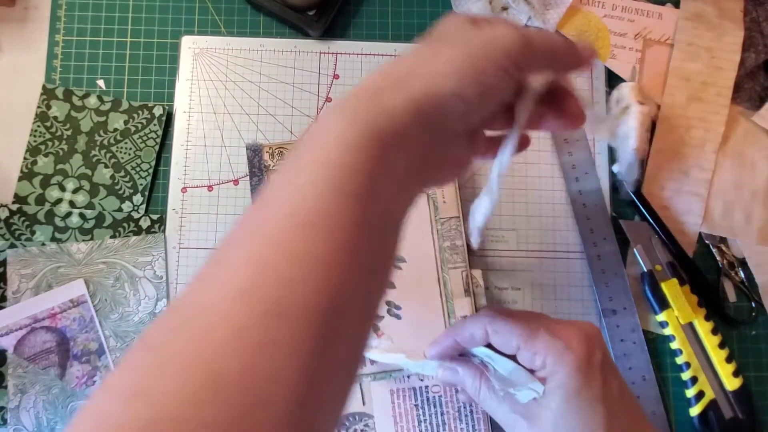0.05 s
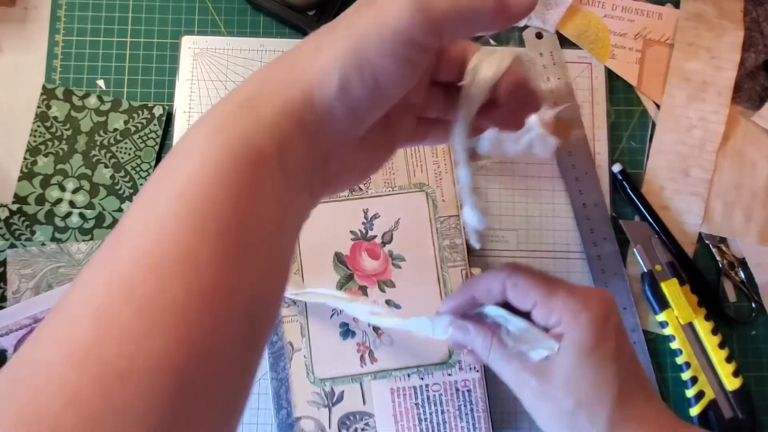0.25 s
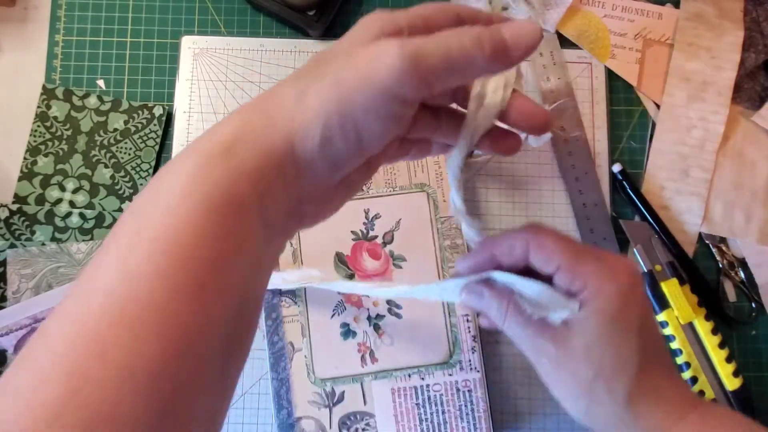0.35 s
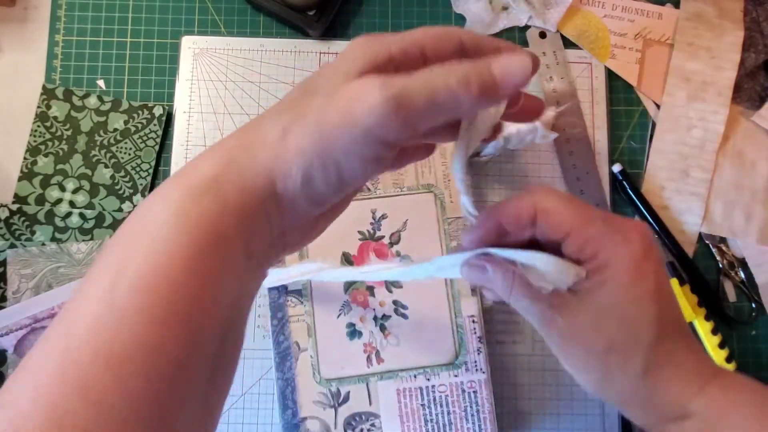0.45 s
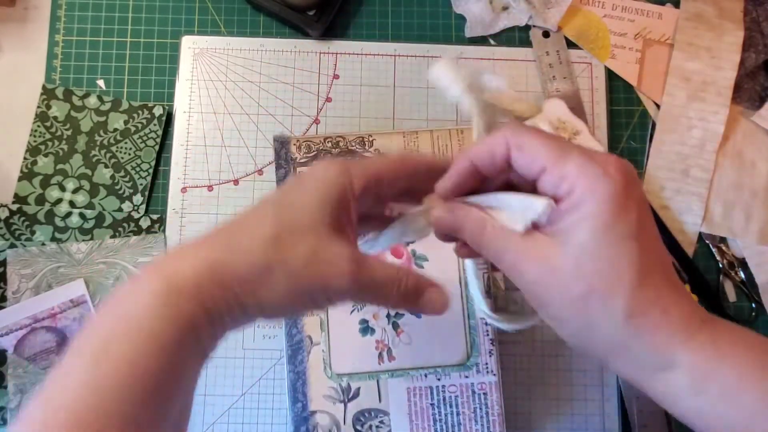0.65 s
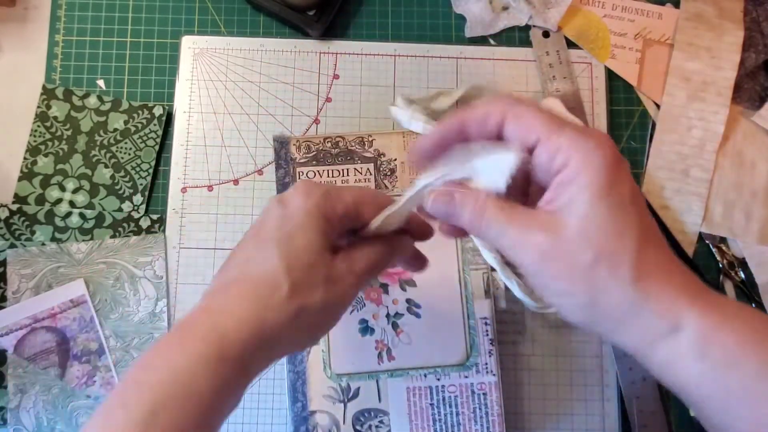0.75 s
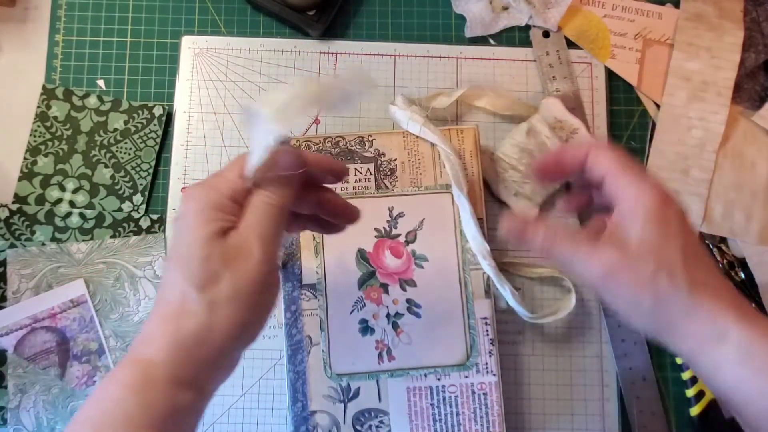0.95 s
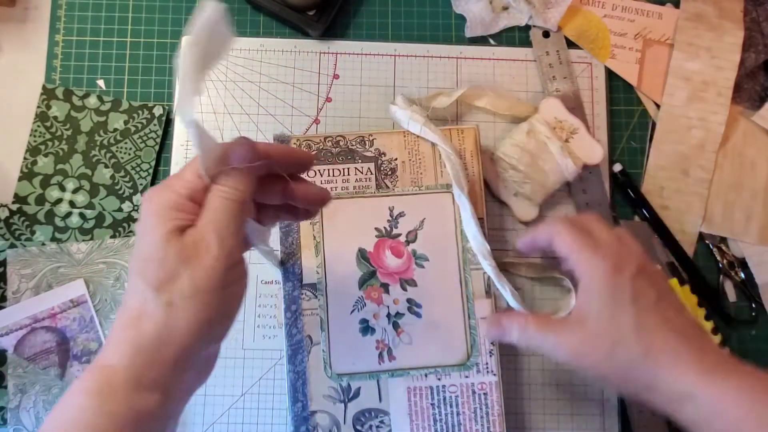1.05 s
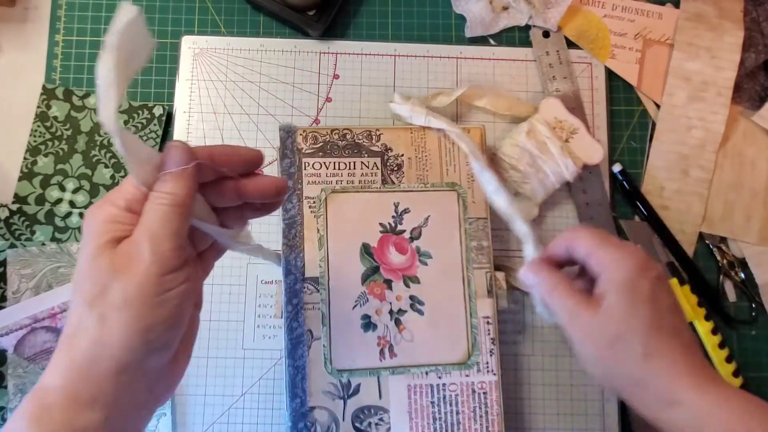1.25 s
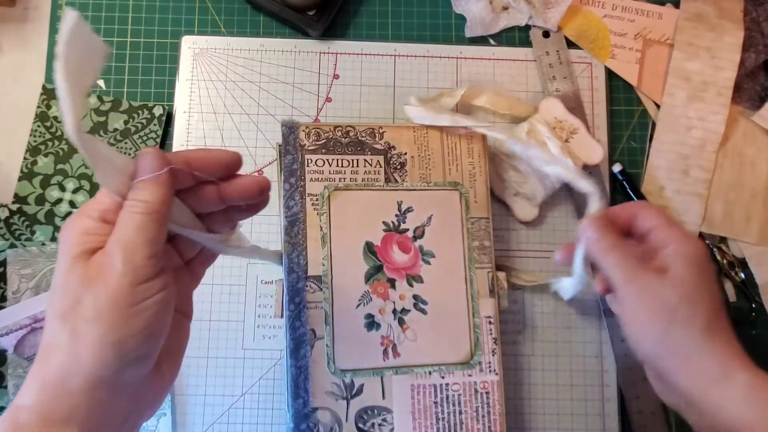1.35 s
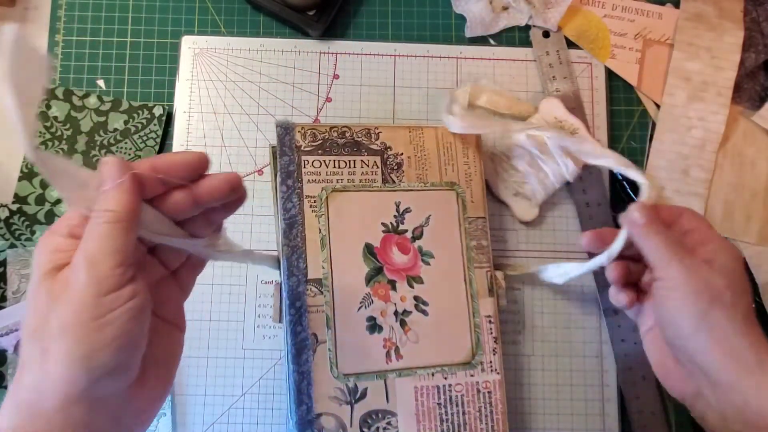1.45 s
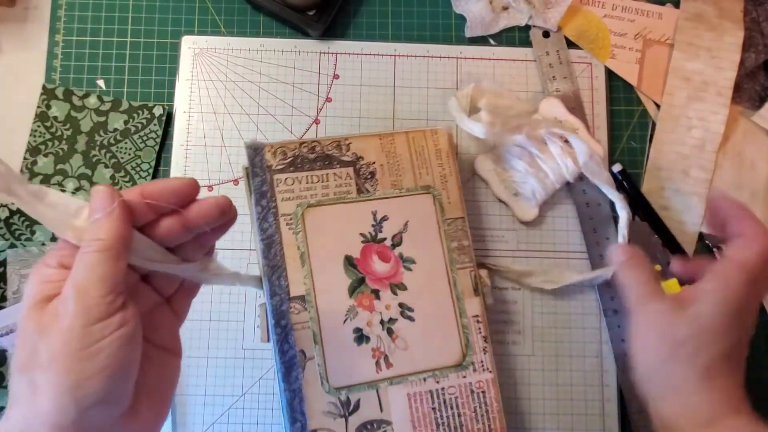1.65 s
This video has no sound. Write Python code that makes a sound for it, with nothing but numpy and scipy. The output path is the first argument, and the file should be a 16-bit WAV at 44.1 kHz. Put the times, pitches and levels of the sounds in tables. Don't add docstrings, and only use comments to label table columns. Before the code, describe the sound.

Ringing, gritty scrape of a hard object dragged across a craft mat, followed by soft silk swishes

```python
import sys
import numpy as np
from scipy import signal
from scipy.fft import rfft, irfft
from scipy.io import wavfile
from scipy.ndimage import uniform_filter1d

SR = 44100
rng = np.random.default_rng(int(sys.argv[2]) if len(sys.argv) > 2 else 0)


def makeup_ratio(level_db):
    decades = np.asarray(level_db, float) / 20
    return 10 ** decades


def wrap_up_sound(samples):
    columns = np.atleast_2d(samples).T
    tamed = np.clip(columns, -1, 1)
    steps = np.round(tamed * 32767).astype(np.int16)
    wavfile.write(sys.argv[1], SR, steps)


N = 74970

LEAN_DB, LATE_LEAN_DB, LATE_FROM_S = 4, -0.5, 0.85


def drag():
    # [t/s, level/dB]
    strokes = [
        [(0.212, -66.5), (0.218, -27), (0.238, -24), (0.288, -30.5), (0.304, -25), (0.374, -35.5), (0.386, -32),
         (0.44, -45)],
        [(0.44, -50.5), (0.488, -38.5), (0.506, -39), (0.548, -43.5), (0.592, -41.5), (0.64, -60.5)],
        [(0.64, -53), (0.668, -49.5), (0.682, -41), (0.71, -40), (0.752, -46), (0.762, -71.5), (0.88, -100)],
    ]
    # [t/s, jump/dB, ring/s]
    slips = [(0.22, -3.5, 0.0033), (0.232, 1.5, .01), (0.2484, 7.5, .005), (.261, 5, 0.002),
             (0.279, 2, .004), (0.2906, 11, .003), (.3007, 10.5, 0.0012), (0.335, 0, 0.0019),
             (0.387, 3.5, 0.01), (0.499, -9, 0.0025), (0.5023, 2.5, .01), (0.564, 8, 0.0093),
             (0.7002, 5, 0.0035), (0.709, 6.5, .002), (0.734, -1, 0.0018)]
    # [f/Hz, width/Hz, level/dB]
    body_modes = [(1016, 26, -5), (2600, 55, 3), (3560, 60, -4), (2480, 60, -7), (775, 60, -12),
                  (1745, 45, -9), (1950, 45, -14), (2165, 70, -8), (2900, 35, -8), (3200, 40, -11),
                  (3850, 120, -9), (4120, 100, -12), (4840, 60, -13), (6100, 400, -7), (8200, 500, -15)]
    # [t/s, f/Hz]
    edge_mode = [(.22, 3750), (.24, 3604), (.31, 3674), (.39, 3966), (.45, 3410), (.52, 3565), (.68, 3480),
                 (.72, 3540)]
    # [f/Hz, level/dB per Hz]
    grit_colour = [(100, -10), (700, -9.5), (1300, -21.5), (2500, -11.5), (4400, -9.5), (7000, 0.5),
                   (11400, 0.5), (16000, -16.5)]
    # [f/Hz, level/dB per Hz]
    slide_colour = [(120, -42), (200, -18.5), (635, -12.5), (1200, -4), (1900, 7.5), (2700, 5),
                    (3600, -6.5), (4500, -8.5), (11500, -37), (16000, -33.5)]
    # [f/Hz, width/Hz, level/dB]
    table_modes = [(79, 34, -45.5), (171.5, 9.9, -50), (145, 11.7, -48), (303.7, 17, -51.5)]
    # [t/s, peak/dB, f/Hz, ring/s]
    struck_modes = [(.009, -46, 3730, 0.006), (.012, -41, 3610, 0.0051), (.038, -38.5, 3820, 0.0021),
                    (.0735, -47, 2560, 0.0046), (1.19, -57.5, 690, 0.0084), (1.214, -71, 748, .007),
                    (.221, -15.5, 3470, .004), (.233, -21, 3530, 0.0047), (0.237, -25, 2587, 0.023),
                    (.2478, -14, 3610, 0.0032), (0.248, -24, 2553, .008), (.26, -44, 3590, 0.0076),
                    (0.264, -34, 2756, 0.0033), (.222, -30.5, 1056, 0.011), (0.229, -40.5, 166.4, 0.073),
                    (.29, -44, 160.3, 0.044), (0.304, -28, 6320, 0.0068), (.24, -27, 5730, 0.015),
                    (0.2942, -44, 2699, 0.0031), (0.295, -25.5, 1026, 0.019), (.2996, -33, 3580, 0.0041),
                    (.308, -22, 3710, .008), (0.323, -56, 2570, 0.0067), (.336, -34, 3680, 0.0031),
                    (.383, -25, 3540, 0.0043), (.389, -36, 3950, 0.0055), (.385, -43, 1024, 0.031),
                    (0.394, -35.5, 2606, 0.015), (.504, -44.5, 761, .01), (0.509, -40, 2900, 0.017),
                    (.512, -36.5, 3536, 0.012), (.575, -50, 1974, 0.015), (.68, -49, 3500, 0.0062),
                    (.708, -53.5, 3470, .006), (0.708, -40, 2504, .01)]
    grit_db, slide_db, light_ring_db = -3, -12, -16
    full_db, press_law, table_law = -25.5, 1, 0.73
    chatter_db, contact_db, pitch_wander = -1, 1.5, 0.004

    t = np.arange(N) / SR
    point_s, point_db = np.transpose([point for stroke in strokes for point in stroke])
    pressure_db = np.interp(t, point_s, point_db, -130, -130)
    jumps_db = sum(jump_db * after(t, s, ring_s) for s, jump_db, ring_s in slips)
    bumps = grains(per_s=6700, spread_db=1)
    light = bumps * makeup_ratio(pressure_db + jumps_db + chatter_db * slow(size=120))
    hard = light * makeup_ratio(press_law * (pressure_db - full_db))

    push = hard + makeup_ratio(light_ring_db) * light
    ring = np.zeros((2, N))
    for k, (hz, width, db) in enumerate(body_modes):
        gain = (-1) ** k * makeup_ratio(db + contact_db * slow(size=700))
        ring += gain * resonate(push, hz * (1 + pitch_wander * slow(size=2000)), width)
    moving_hz = np.interp(t, *np.transpose(edge_mode))
    ring += makeup_ratio(2) * resonate(push, moving_hz, width=150)
    ring /= np.sqrt(sum(makeup_ratio(2 * db) * 2 * np.pi * width / SR for hz, width, db in body_modes))

    grit = makeup_ratio(grit_db) * colour(hard, grit_colour) / colour(bumps, grit_colour).std()
    slide = makeup_ratio(slide_db) * colour(light, slide_colour) / colour(bumps, slide_colour).std()
    catches = sum(makeup_ratio(db) * ping(t, s, hz, ring_s, rise=0.0025) for s, db, hz, ring_s in struck_modes)

    shake = rng.standard_normal(N) * makeup_ratio(table_law * (pressure_db - full_db))
    table = sum(makeup_ratio(db) * resonate(shake, hz, width) * np.sqrt(SR / (2 * np.pi * width))
                for hz, width, db in table_modes)
    return lean(ring + grit + slide + catches, LEAN_DB) + table


def silk():
    # [t/s, length/s, level/dB, paper share/dB]
    swishes = [(0.057, 0.063, -64, 3.5), (0.423, 0.12, -56.5, 2), (0.615, 0.14, -66.5, -2.5),
               (0.734, 0.18, -72, -12.5), (0.1, 0.073, -61.5, -1.5), (0.999, 0.056, -73.5, -8.5),
               (1.129, 0.026, -70, -14.5), (1.161, 0.082, -69.5, -8), (1.266, 0.084, -70, -8),
               (1.377, 0.037, -66, -12.5), (1.423, 0.078, -64, -16.5), (1.504, 0.054, -66.5, -14.5),
               (1.55, 0.11, -80.5, -5.5)]
    # [t/s, peak/dB, low share/dB, ring f/Hz]
    ticks = [(1.003, -49, -13.5, 2620), (1.033, -55.5, -21, 3620), (1.1264, -52, -10.5, 2190),
             (1.135, -50, -11.5, 2000), (1.181, -50, -12, 1860), (1.189, -50, -11, 1080),
             (1.2211, -48.5, -25.5, 2744), (1.241, -52.5, -31, 1986), (1.2829, -41, -13.5, 1230),
             (1.3273, -52, -14.5, 1410), (1.3433, -52.5, -10, 1348), (1.3817, -48, -16, 1230),
             (1.399, -53, -4.5, 4500), (1.4271, -53, -5, 4520), (1.434, -33, -32, 1260),
             (1.456, -51.5, -7.5, 1296), (1.457, -56, -3, 3400), (1.468, -51, -14, 1485)]
    # [f/Hz, peak/dB, ring/s]
    snap_modes = [(700, -67, .004), (2700, -61, .0016), (5300, -62, .0012), (13000, -62, .0006),
                  (14200, -60, .0006), (15400, -60, .0006)]
    # [f/Hz, level/dB per Hz]
    sheen_colour = [(2940, -36), (5000, -17), (7270, -10), (8670, -5), (11900, -4.5), (15200, -6.5),
                    (16000, -9.5)]
    # [f/Hz, level/dB per Hz]
    paper_colour = [(350, -19.5), (686, -2), (993, -9), (1350, -3.5), (1950, -5.5), (3400, -9.5),
                    (5000, -12), (7000, -25.5), (15400, -70)]
    # [f/Hz, level/dB per Hz]
    brush_colour = [(180, -47.5), (300, -8.5), (645, -12.5), (1500, -22.5), (2600, -11), (3800, -11.5),
                    (7320, -13), (10700, -9), (16000, -23)]
    # [end/s, fade/s, level/dB, catch t/s, catch jump/dB]
    brush_end, brush_fade, brush_db, catch_s, catch_db = (.048, .01, -50, .035, 5)
    swish_rise = 0.25
    tick_s, tick_ring_db, tick_ring_cycles = 0.002, -6, 4.33

    t = np.arange(N) / SR
    sheen, paper, brush = (evened(colour(grains(per_s=9000, spread_db=4), points))
                           for points in (sheen_colour, paper_colour, brush_colour))
    brush_level = makeup_ratio(brush_db + catch_db * after(t, catch_s, tick_s * 3))
    out = brush * brush_level * np.exp(-np.maximum(t - brush_end, 0) / brush_fade)

    for start, length, db, low_db in swishes:
        u = np.clip((t - start) / length, 0, 3)
        swell = np.minimum(u / swish_rise, 1) * np.exp(-u ** 3)
        out = out + makeup_ratio(db) * swell * (sheen + makeup_ratio(low_db) * paper)

    for s, db, low_db, hz in ticks:
        ring = ping(t, s, hz, tick_ring_cycles / hz, 1 / hz)
        out = out + makeup_ratio(db + low_db + tick_ring_db) * ring
        burst = after(t, s, tick_s) * np.clip((t - s) / tick_s, 0, 1) ** 0.5
        out = out + makeup_ratio(db - 11) * burst * (sheen + makeup_ratio(low_db) * paper)

    snap = sum(makeup_ratio(db) * ping(t, 1.005, hz, ring_s, 1 / hz) for hz, db, ring_s in snap_modes)
    return lean(out + snap, np.where(t < LATE_FROM_S, LEAN_DB, LATE_LEAN_DB))


def knocks():
    # [t/s, peak/dB, crack/dB, crack decay/s, push/dB]
    hits = [
        (0.0732, -43, -65, 0.006, -87),
        (0.1072, -39.5, -33.5, 0.0027, -71),
        (1.5322, -55, -88, 0.0037, -61.5),
    ]
    # [f/Hz, level/dB, t60/s]
    board_modes = [(68.4, -19.5, .1), (162, -3.5, 0.066), (308, -7, 0.08), (438.3, -6, 0.05),
                   (501, 2, 0.031), (567.8, -8, 0.2049), (633, -12.5, 0.06), (990, -17, 0.025),
                   (1350, -8.5, 0.033), (1482, -11.5, 0.03)]
    # [f/Hz, level/dB, t60/s]
    thud_modes = [(69.6, -3, .2), (108, 6, .06), (324.5, 2.5, 0.06), (399.5, 2.5, 0.071), (690, -5, 0.053)]
    # [f/Hz, level/dB per Hz]
    crack_colour = [(500, -4), (1300, -5.5), (3500, 5.5), (5000, -4.5), (7000, -5.5), (11000, -7),
                    (16000, -18)]
    thud_from_s, push_s = 1.5, 0.0016

    t, out = np.arange(N) / SR, np.zeros((2, N))
    crack = evened(colour(grains(per_s=SR / 2, spread_db=0.93), crack_colour))
    for s, db, crack_db, crack_s, push_db in hits:
        modes = thud_modes if s > thud_from_s else board_modes
        detune = rng.uniform(0.99, 1.01, len(board_modes))
        ring = np.zeros(N)
        for (hz, mode_db, t60), k in zip(modes, detune):
            decay = after(t, s, t60 / np.log(1000))
            ring += makeup_ratio(db + mode_db) * decay * np.sin(2 * np.pi * hz * k * (t - s))
        ring = ring * np.clip((t - s) / push_s, 0, 1) ** 0.5
        push = makeup_ratio(push_db) * np.e * (t - s) / push_s * after(t, s, push_s)
        hit = ring + push + makeup_ratio(crack_db) * after(t, s, crack_s) * crack
        out -= lean(hit, LEAN_DB if s < LATE_FROM_S else LATE_LEAN_DB)
    return out


def space(x):
    # [f/Hz, t60/s]
    room_decay = [(100, 0.53), (1000, 0.25), (4000, 0.234), (15000, 0.17)]
    tail_db, half = -7, SR // 2
    noise = rng.standard_normal((2, half)) * (np.arange(half) / SR > 0.003)
    hz, tail_s, z = signal.stft(noise, SR, nperseg=256)
    z *= makeup_ratio(-60 * tail_s / read(room_decay, hz)[:, None])
    z *= np.minimum(hz / 400, 1)[:, None]
    tail = signal.istft(z, SR, nperseg=256)[1][:, :half]
    tail = makeup_ratio(tail_db) * tail / np.linalg.norm(tail[0])
    return x + signal.fftconvolve(x, tail, axes=1)[:, :N]


def room_tone():
    # [f/Hz, level/dB per Hz]
    hum_colour = [(35, -22.5), (62, 0), (92, -7.5), (157, -16.5), (775, -32), (1000, -40), (6740, -47.5),
                  (9570, -44)]
    # [f/Hz, likeness/0-1]
    hum_likeness = [(30, 0.5), (120, .9), (600, 0.6), (2000, 0), (15000, 0.05)]
    hum_db = -63
    frames, hz = N // 256 + 5, np.fft.rfftfreq(1024, 1 / SR)
    a, b, c, d, patches = rng.standard_normal((frames, 513, 5)).T
    patches = uniform_filter1d(patches, size=8, axis=0)
    patches = evened(uniform_filter1d(patches, size=14, axis=1))
    same = np.clip(read(hum_likeness, hz), -1, 1)[:, None]
    left, other = a + 1j * b, c + 1j * d
    right = same * left + np.sqrt(1 - same ** 2) * other
    z = np.array([left, right]) * makeup_ratio(0.5 * patches)
    noise = signal.istft(z, nperseg=1024, noverlap=768)[1][:, :N]
    return makeup_ratio(hum_db) * evened(colour(noise, hum_colour))


def grains(per_s, spread_db):
    # [f/Hz, likeness/0-1]
    near_likeness = [(130, 0.4), (640, .95), (1400, 0.83), (3100, 0.6), (6800, 0.5), (15000, 0)]
    size = makeup_ratio(spread_db * np.minimum(rng.exponential(1, (2, N)), 4))
    sign = rng.choice([-1., 1.], (2, N))
    a, b = rfft(size * sign * (rng.random((2, N)) < per_s / SR))
    same = np.clip(read(near_likeness, np.fft.rfftfreq(N, 1 / SR)), 0, 1)
    return evened(irfft(np.array([a, same * a + np.sqrt(1 - same ** 2) * b]), N))


def resonate(x, hz, width):
    turn = np.exp(2j * np.pi * np.cumsum(hz * np.ones(N)) / SR)
    r = np.exp(-np.pi * width / SR)
    return 2 * (turn * signal.lfilter([1 - r], [1, -r], x / turn)).real


def ping(t, s, hz, ring, rise):
    return after(t, s, ring) * np.clip((t - s) / rise, 0, 1) * np.sin(2 * np.pi * hz * (t - s))


def after(t, s, ring):
    return (t >= s) * np.exp(-np.maximum(t - s, 0) / ring)


def slow(size):
    once = uniform_filter1d(rng.standard_normal(N), size=size)
    return evened(uniform_filter1d(once, size=size))


def lean(x, db):
    x = x * np.ones((2, 1))
    return np.array([np.roll(x[0], 2), x[1]]) * makeup_ratio(np.array([[0.5], [-0.5]]) * db)


def colour(x, points):
    hz = np.fft.rfftfreq(x.shape[-1], 1 / SR)
    ends = [(points[0][0] / 2, points[0][1] - 30)] + list(points)
    return irfft(rfft(x) * makeup_ratio(read(ends, hz)), x.shape[-1])


def read(points, hz):
    f, value = np.transpose(points)
    return np.interp(np.log(hz + 1), np.log(f + 1), value)


def evened(x):
    return x / np.sqrt(np.mean(x ** 2) + 1e-20)


def scene():
    return space(drag() + silk() + knocks()) + room_tone()


def top_cut(x):
    return signal.sosfilt(signal.butter(12, 16510, fs=SR, output="sos"), x)


def record(dry):
    notch_hz, notch_width_hz, notch_db = 7100, 400, -8
    edge_hz, edge_db, top_hz = 15800, -30, 16450
    hz = np.fft.rfftfreq(N, 1 / SR)
    notch = notch_db * np.exp(-((hz - notch_hz) / notch_width_hz) ** 2)
    edge = edge_db * np.clip((hz - edge_hz) / 150, 0, 1)
    mix = irfft(rfft(dry) * makeup_ratio(notch + edge) * (hz < top_hz), N)
    return top_cut(mix)


dry = scene()
out = record(dry)
wrap_up_sound(out)
```